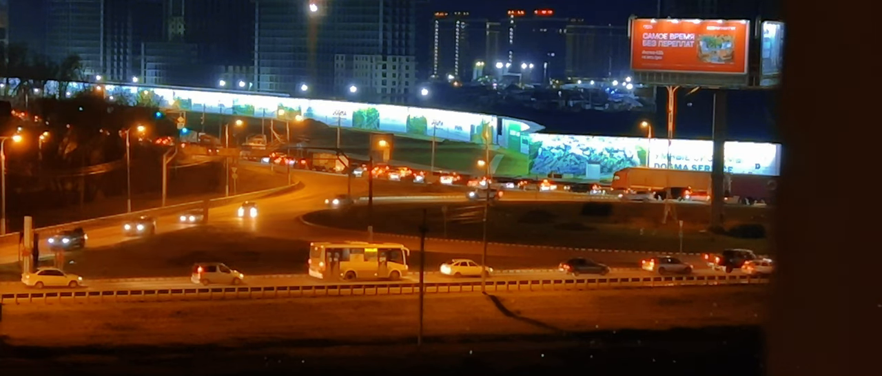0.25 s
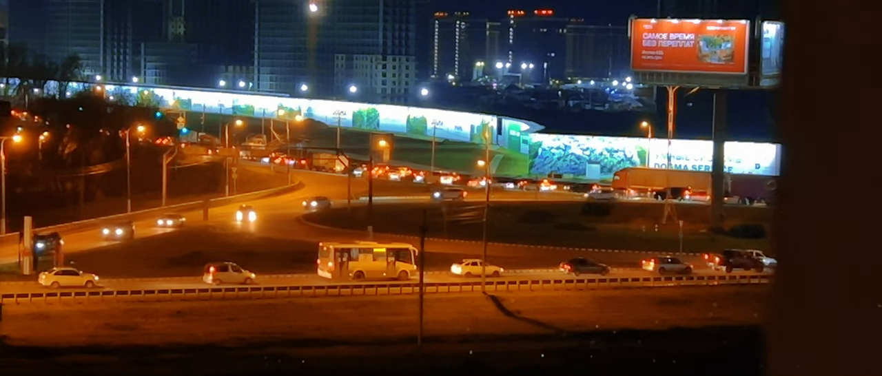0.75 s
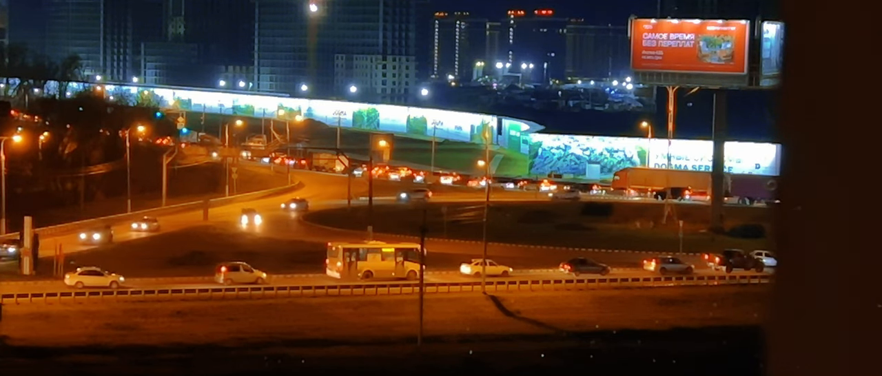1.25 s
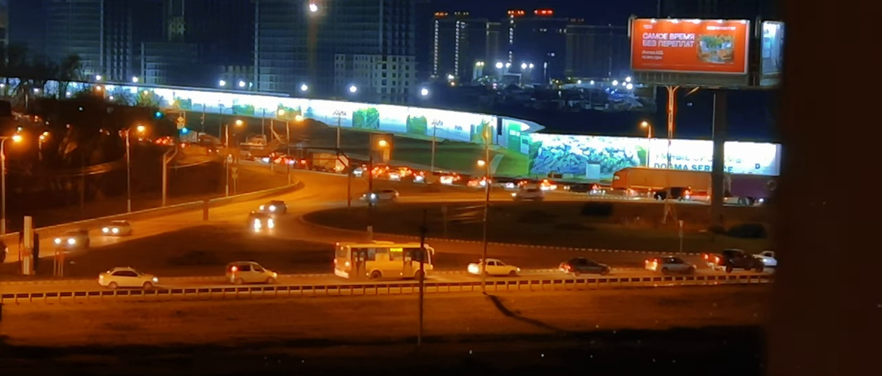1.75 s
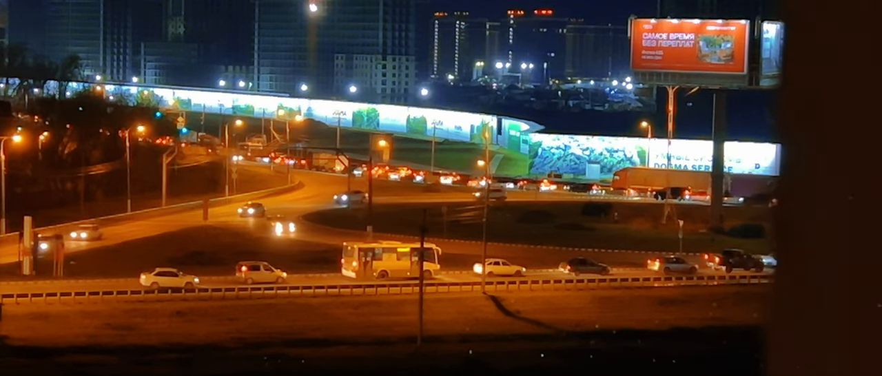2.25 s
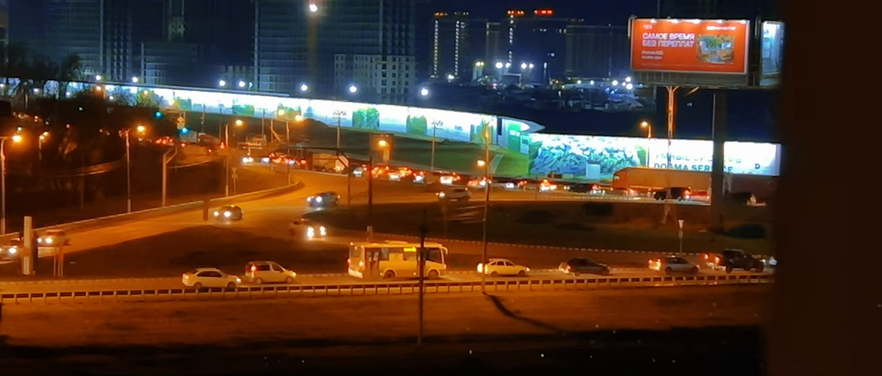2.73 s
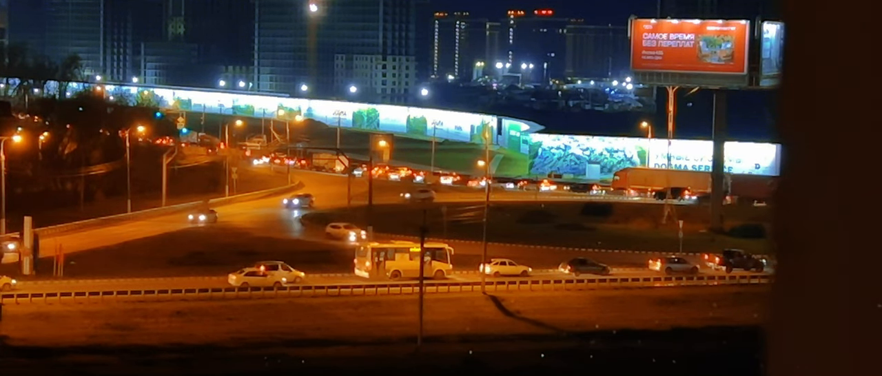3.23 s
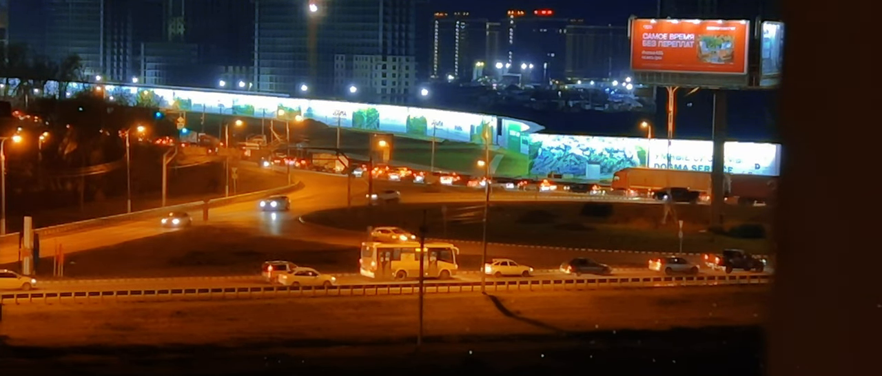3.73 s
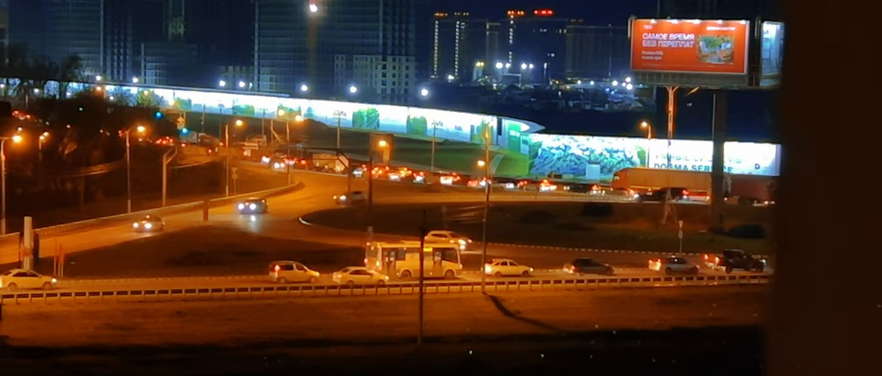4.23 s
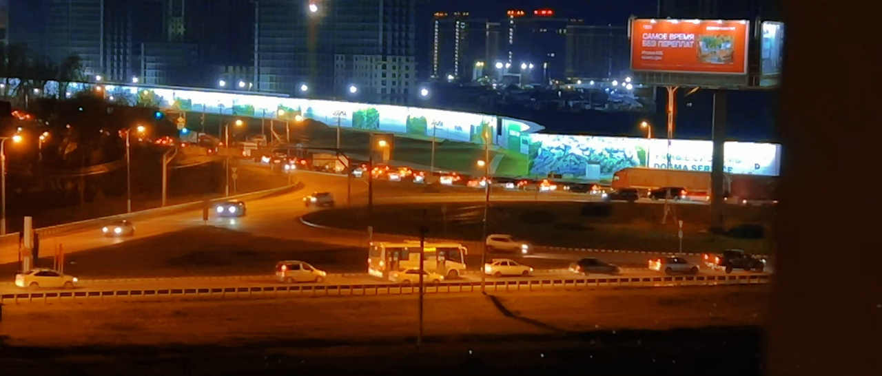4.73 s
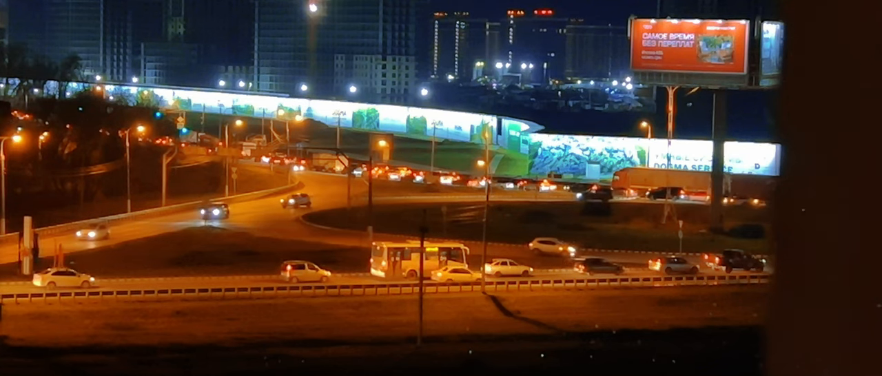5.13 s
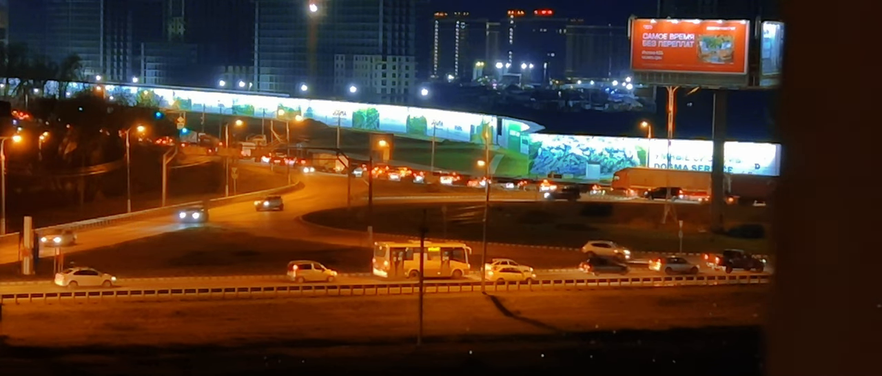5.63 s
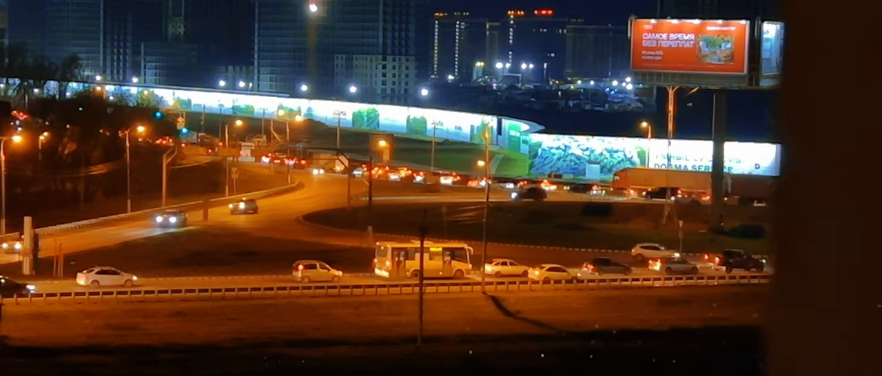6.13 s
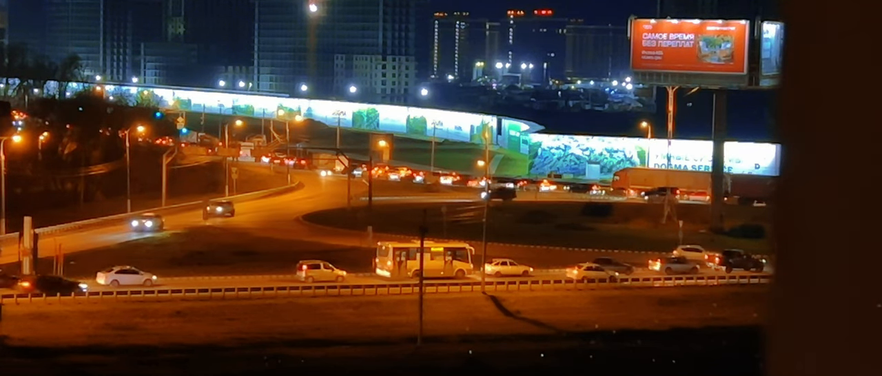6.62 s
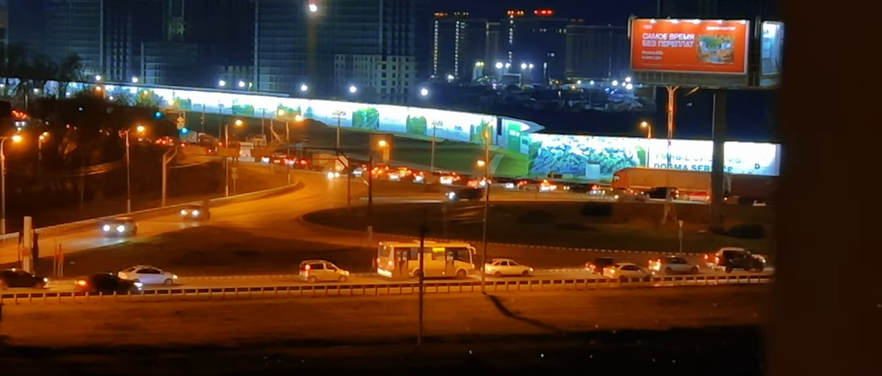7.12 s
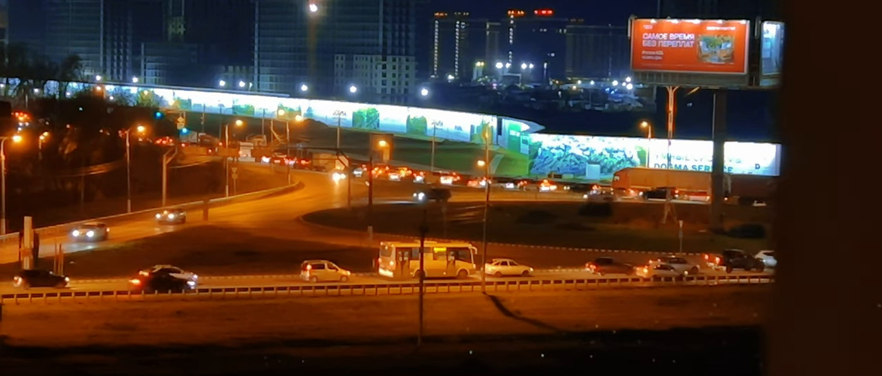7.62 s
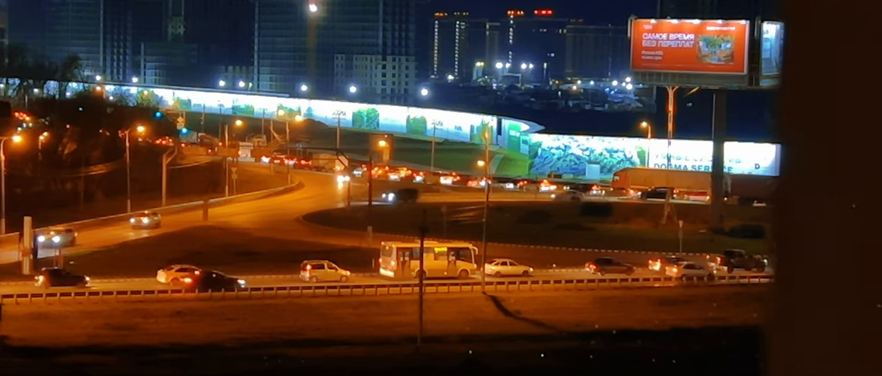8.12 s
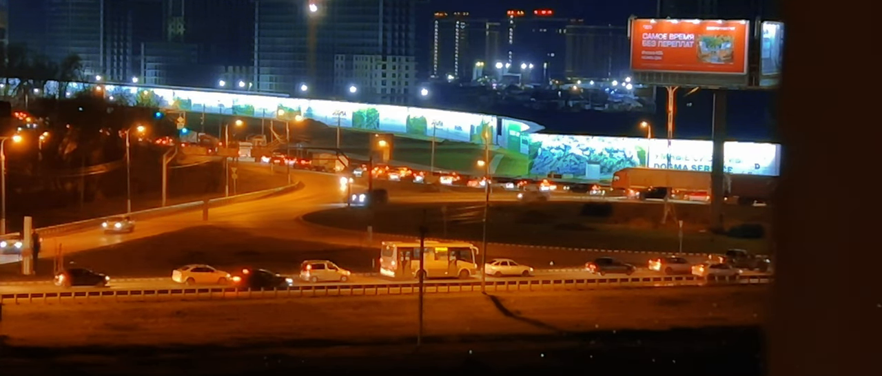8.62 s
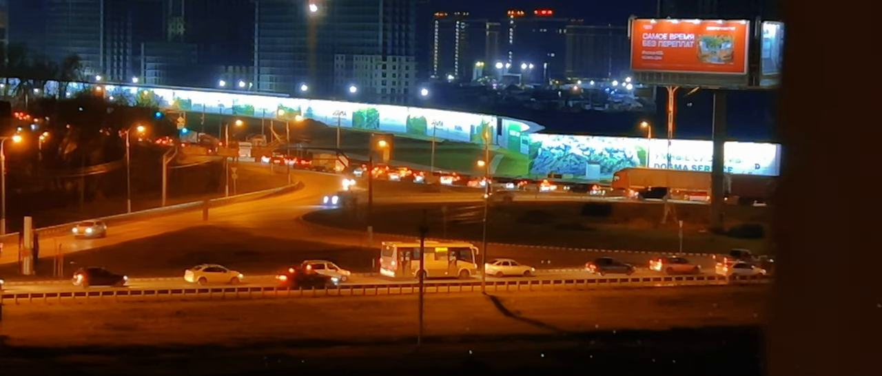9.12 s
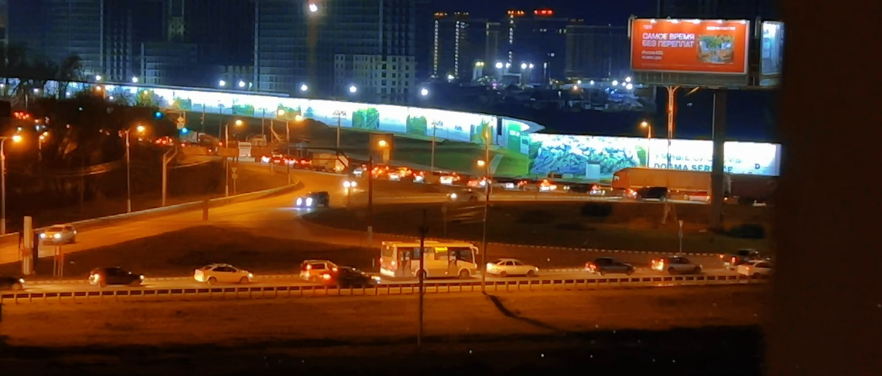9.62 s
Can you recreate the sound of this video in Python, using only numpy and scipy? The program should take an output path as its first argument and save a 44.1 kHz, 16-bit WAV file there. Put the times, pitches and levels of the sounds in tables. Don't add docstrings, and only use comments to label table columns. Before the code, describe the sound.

A deep, continuous rumble of slow city traffic, a revving car near seven seconds, a bus droning by, tiny snaps and faint squeaks.

```python
import sys
import numpy as np
from scipy import signal
from scipy.fft import rfft, irfft, next_fast_len
from scipy.io import wavfile
from scipy.ndimage import uniform_filter1d, map_coordinates

SR = 44100
rng = np.random.default_rng(int(sys.argv[2]) if len(sys.argv) > 2 else 0)


def invert_db(x):
    u = np.asarray(x, float) / 20
    return 10 ** u


def transcribe(signal):
    frames = np.atleast_2d(signal).T
    limited = np.clip(frames, -1, 1)
    pcm = np.round(limited * 32767).astype(np.int16)
    wavfile.write(sys.argv[1], SR, pcm)


N = 434812


def unit(x):
    return x / np.sqrt(np.mean(x ** 2) + 1e-20)


def along(points, hz):
    f, *cols = np.transpose(points)
    return [np.interp(np.log(hz + 1), np.log(f + 1), c) for c in cols]


def curves(rows):
    s, *cols = np.transpose(rows)
    return [np.interp(np.arange(N) / SR, s, c) for c in cols]


def wobble(rate, size=N):
    knots = rng.standard_normal(int(size * rate / SR) + 4)
    return map_coordinates(knots, [np.arange(size) * rate / SR])


def filtered(x, response):
    edge = 4096
    wide = np.pad(x, [(0, 0)] * (np.ndim(x) - 1) + [(edge, edge)], mode="reflect")
    m = next_fast_len(wide.shape[-1])
    spectrum = rfft(wide, m) * response(np.fft.rfftfreq(m, 1 / SR))
    return irfft(spectrum, m)[..., edge:edge + x.shape[-1]]


def resonance(centre_hz, width_hz):
    def response(f):
        damping = 1j * f * width_hz
        return (damping / (centre_hz ** 2 - f * f + damping)) ** 3
    return response


def rush(spectrum, patchy_db):
    z = signal.stft(rng.standard_normal((2, N)), nperseg=512)[2]
    field = uniform_filter1d(rng.standard_normal(z.shape[1:]), size=6, axis=0)
    field = unit(uniform_filter1d(field, size=20, axis=1))
    pair = signal.istft(z * invert_db(patchy_db * field), nperseg=512)[1][:, :N]
    return unit(filtered(pair, lambda hz: invert_db(along(spectrum, hz)[0])))


def notes(rows, orders, fade=0.09, flutter_db=1.0, drift_db=1.5, unsteady=.003):
    hz, level_db = curves(rows)
    t = np.arange(N) / SR
    start, end = rows[0][0], rows[-1][0]
    since_start = t - start + (start == 0)
    until_end = end - t + (end > 9.8)
    heard = np.clip(np.minimum(since_start, until_end) / fade, 0, 1)
    turns = 2 * np.pi * np.cumsum(hz * (1 + unsteady * wobble(6))) / SR
    tone = 0
    for i, (k, db) in enumerate(orders):
        order_db = db + flutter_db * wobble(7) + (i > 0) * drift_db * wobble(2.4)
        tone = tone + invert_db(order_db) * np.sin(k * turns + rng.uniform(0, 2 * np.pi))
    return np.sqrt(2) * heard * invert_db(level_db) * tone


def swell(t, length, db, order=2):
    return invert_db(db - 15.5 * abs(2 * t / length) ** order)


def glides(rows, flutter_db, unsteady, order=2):
    out = np.zeros(N + 4 * SR)
    t = np.arange(-SR, SR) / SR
    for s, length, hz, glide, db in rows:
        rate = (hz + glide * t) * (1 + unsteady * wobble(7.4, size=len(t)))
        turns = 2 * np.pi * np.cumsum(rate) / SR
        level = swell(t, length, db + flutter_db * wobble(7, size=len(t)), order=order)
        out[round(s * SR):][:len(t)] += np.sqrt(2) * level * np.sin(turns)
    return out[SR:SR + N]


def crowd():
    # f/Hz, level/dB per Hz
    idling_bands = [(18, -45), (30, -16), (40, -5.5), (52, 2), (62, 4), (76, 3), (92, -5), (110, -20.5),
                    (140, -44.5), (250, -120)]
    body_bands = [(50, -90.5), (80, -26), (105, -3), (145, -1.5), (190, -9), (240, -5), (300, -9),
                  (400, -12.5), (550, -13.5), (800, -30), (1400, -120)]
    tyre_bands = [(300, -48), (500, -7), (700, -1), (900, 0), (1100, -1.5), (1400, -7), (1650, -9.5),
                  (1850, -11.5), (2000, -16), (2200, -61.5), (2600, -120)]
    hiss_bands = [(1800, -50), (2000, -5), (2170, 0), (2500, -5), (3000, -8), (4000, -17), (5000, -24),
                  (6300, -29.5), (7000, -34), (8000, -41.5), (9000, -45), (11200, -45), (14250, -53),
                  (14600, -85)]
    # t/s, tyre roar/dB, extra brightness/dB
    flow = [(0, -38, 1), (.47, -39, 2), (1.01, -37.5, -0.5), (1.8, -38, 0.5), (2.63, -37, 1.5),
            (3.5, -38.5, 0.5), (4.2, -39, 1), (4.5, -39, 0), (5.25, -38.5, 1), (5.74, -36.5, .5),
            (6.73, -35, 1), (7.22, -35, 0.5), (7.66, -36.5, 1), (8.29, -36.5, -0.5), (9.35, -37, 0),
            (9.6, -35.5, 0.5), (9.86, -36, 1.5)]
    tyre_db, clear_db = curves(flow)
    swing_db = tyre_db - tyre_db.mean()
    idling = invert_db(-31.5 + 0.05 * swing_db) * rush(idling_bands, patchy_db=-0.5)
    body = invert_db(-33 + 0.074 * swing_db) * rush(body_bands, patchy_db=0.2)
    tyres = invert_db(tyre_db + 3.0) * rush(tyre_bands, patchy_db=0.62)
    hiss = invert_db(-49 + 0.49 * swing_db + clear_db) * rush(hiss_bands, patchy_db=0.77)
    return idling + body + tyres + hiss


def whine():
    # f/Hz, level/dB
    lines = [(9528, -98), (9672, -97)]
    return sum(invert_db(db) * unit(filtered(rng.standard_normal(N), resonance(hz, 110))) for hz, db in lines)


def van():
    # t/s, firing f/Hz, level/dB
    path = [
        (0.0, 74.6, -33),
        (0.8, 79.6, -34),
        (1.55, 85.1, -38.5),
        (1.9, 87.2, -51),
    ]
    # multiple of firing rate, level/dB
    van_orders = [(1, 0), (2, -6), (3, -9), (4, -19)]
    return notes(path, van_orders)


def passers():
    surfacing = [(.35, .8, 138.1, 13, -36.5), (.37, .9, 70.3, 1, -36), (.48, 1, 114, 1, -37),
                 (.95, .9, 143.2, 3, -43), (1.1, 0.58, 70, 2, -38.5), (2.6, 1.6, 83.9, 1, -43.5),
                 (2.8, 1.4, 166.4, 0, -46), (3.87, 0.7, 139.3, 12, -38.5), (4.03, 0.77, 78.9, 2, -42),
                 (4.2, 1.0, 125.2, 13, -36), (4.45, .5, 142.5, 0, -40.5), (4.9, .4, 140.9, -6, -36.5),
                 (5.36, .35, 143.7, 0.5, -32), (8.43, 0.37, 65, 1, -22.5), (9.3, 1.6, 132.5, 0.5, -39),
                 (9.6, .45, 62.5, 1.5, -29.5)]
    return glides(surfacing, flutter_db=1.5, unsteady=0.0037)


def queue():
    low_swells = [(0.596, 0.85, 56.5, -36), (1.302, 1.0, 52.26, -33.5), (2.69, 0.48, 53, -38),
                  (3.588, .6, 49.33, -45), (4.257, 0.98, 50.83, -35), (5.31, 2.1, 57.09, -39),
                  (6.306, 0.54, 56.9, -33), (6.925, 1, 54.48, -37), (7.75, 1.5, 55.9, -31.5),
                  (8.799, 0.63, 55.26, -28), (9.541, 0.77, 54.66, -28.5)]
    t = np.arange(N) / SR
    swelling = sum(swell(t - s, length, db) for s, length, hz, db in low_swells)
    pitch = [(0, low_swells[0][2], 0)]
    pitch += [(s, hz, 0) for s, _, hz, _ in low_swells]
    pitch += [(N / SR, low_swells[-1][2], 0)]
    return swelling * notes(pitch, [(1, 0.68)])


def grains(per_second, spread_db):
    sizes = invert_db(spread_db * (np.clip(rng.standard_normal(N), -2, 2) + wobble(70)))
    return unit((rng.random(N) < per_second / SR) * sizes * rng.standard_normal(N))


def crossings():
    # start t/s, hold/s, rustle level/dB, brighter grains/dB relative
    wheels = [(1.123, 1.2, -67, -17.5), (1.931, 0.055, -66.5, -12), (2.052, 0.38, -70, -18),
              (2.604, 0.12, -67.5, -15), (3.19, 0.13, -63.5, -6.5), (3.306, 0.12, -63, -14),
              (3.554, .3, -72, -11), (4.132, 0.17, -68.5, -8.5), (5.0, 0.31, -70, -9),
              (6.12, 0.052, -65.5, -9), (6.59, 0.18, -70.5, -6.5), (6.856, 0.045, -63, -7),
              (7.15, 0.16, -68.5, -5.5), (7.304, 0.081, -66, -10), (7.43, .08, -72, -12.5),
              (7.95, 0.029, -73, -10), (8.3, 0.14, -71.5, -9.5), (8.55, 0.29, -70, -14)]
    rise_db_per_s, fall_db_per_s, floor_db = 202.5, 76.5, -91.5
    t = np.arange(N) / SR
    dull, bright = invert_db(floor_db), invert_db(floor_db - 16)
    for s, hold, db, bright_db in wheels:
        rise_db = rise_db_per_s * np.clip(s - t, 0, 1)
        fall_db = fall_db_per_s * np.clip(t - s - hold, 0, 1)
        shape = invert_db(db - rise_db - fall_db)
        dull, bright = dull + shape, bright + invert_db(bright_db) * shape
    return dull, bright


def grit():
    dull_gain, bright_gain = crossings()
    dull = unit(filtered(grains(3000, spread_db=2.5), resonance(6160, 1500)))
    bright = unit(filtered(grains(2500, spread_db=5.5), resonance(7800, 1100)))
    return invert_db(-3) * (dull_gain * dull + invert_db(-4) * bright_gain * bright)


def snaps():
    # t/s, peak level/dB, f/Hz
    single_snaps = [(1.7714, -46, 6800), (1.9475, -45, 6440), (1.9854, -44, 6210), (2.1206, -54, 6200),
                    (2.7147, -51, 5900), (6.1739, -39, 5570), (6.8758, -55, 6470), (7.3427, -52, 6860),
                    (7.3594, -46, 6240), (7.4764, -59, 6320), (8.3988, -50, 6090), (8.7685, -51, 6050),
                    (1.957, -52, 6860), (3.7419, -56, 7760), (6.145, -47, 6960), (6.7974, -57, 8102),
            (7.205, -46, 6920), (7.3083, -58, 6960), (8.297, -53, 6850)]
    out = np.zeros(N + SR)
    t = np.arange(SR // 20) / SR
    for s, db, hz in single_snaps:
        blow = rng.standard_normal(len(t)) * (1 - np.exp(-t / .0015)) * invert_db(-60 * t / 0.042)
        snap = filtered(np.pad(blow, 5000), resonance(hz, 1500))[5000:]
        out[round(s * SR):][:len(snap)] += invert_db(db - 4.5) * snap / abs(snap).max()
    return out[:N]


def bus():
    # t/s, cycle rate f/Hz, firing note level/dB
    path = [(1.9, 23.3, -55), (2.35, 23.96, -42.5), (2.74, 24.18, -38.5), (3.58, 25.45, -43.5),
            (3.99, 26.1, -41), (4.8, 26.98, -46.5), (5.25, 26.62, -37), (6.1, 25.67, -33.5),
            (6.93, 25.01, -41), (7.35, 24.84, -44), (7.77, 24.46, -31), (9.02, 23.11, -27.5),
            (9.44, 22.48, -34.5), (9.86, 21.8, -34.5)]
    # multiple of cycle rate, pulling level/dB, coasting level/dB
    rasp_orders = [(4, -42.5, -56), (5, -43, -40.5), (7, -49.5, -48), (8, -55.5, -49.5), (9, -44.5, -55)]
    lifts_s, eases_s = 3.8, 1.1
    coasting = np.clip((np.arange(N) / SR - lifts_s) / eases_s, 0, 1)
    firing_db = curves(path)[1]
    rasp = []
    for k, pull_db, coast_db in rasp_orders:
        rasp.append((k, pull_db + (coast_db - pull_db) * coasting - firing_db))
    return notes(path, [(3, 1.0)] + rasp, fade=.3, drift_db=2.5)


def scuffs():
    scrapes = [
        (4.13, .11, 3100, 1100, -50),
        (4.16, .06, 5400, 1100, -62),
        (4.33, .25, 380, 300, -38),
        (6.62, .16, 5100, 1300, -63),
        (5.22, .06, 4700, 600, -66),
        (6.62, .08, 7500, 900, -72),
    ]
    out = np.zeros(N + SR)
    for s, length, hz, width_hz, db in scrapes:
        size = round(length * SR)
        rub = filtered(rng.standard_normal(SR // 4), resonance(hz, width_hz))
        out[round(s * SR):][:size] += invert_db(db) * unit(rub)[:size] * np.hanning(size)
    return out[:N]


def brakes():
    squeaks = [
        (4.33, .19, 5627, -60, -66),
        (8.86, .11, 6570, 1500, -70),
        (6.7, .16, 3320, 0, -62),
        (4.2, .05, 3300, 0, -61),
    ]
    return glides(squeaks, flutter_db=1.5, unsteady=.002, order=4)


def truck():
    # t/s, firing f/Hz, level/dB
    path = [
        (5.7, 73.7, -57),
        (6.0, 73.1, -48),
        (7.2, 73.9, -37),
        (7.5, 75.2, -52.5),
    ]
    # multiple of firing rate, level/dB
    truck_orders = [(2, 0.5), (3, -5), (5, -11.5)]
    return notes(path, truck_orders)


def revving_car():
    # t/s, firing f/Hz, level/dB
    path = [
        (6.1, 64.4, -39),
        (6.45, 62.63, -38),
        (6.92, 72.07, -24.5),
        (7.2, 77.4, -30.5),
        (7.75, 85.9, -43),
        (8.02, 84.4, -37),
        (8.3, 81, -35),
    ]
    # multiple of firing rate, level/dB
    car_orders = [(1, 1.5), (4, -24.5)]
    return notes(path, car_orders)


def ticks():
    # t/s, peak level/dB
    crackles = [
        (7.58, -57.5),
        (8.743, -69),
    ]
    blows, t = np.zeros(N), np.arange(SR // 50) / SR
    for s, db in crackles:
        decay = invert_db(db + 12 - 60 * t / .012)
        blows[round(s * SR):][:len(t)] = decay * rng.standard_normal(len(t))
    return filtered(blows, resonance(12500, 6000))


def ports(pair):
    # f/Hz, likeness 0-1, left leads/rad, left over right/dB
    port_field = [(50, .992, -.1, 0), (150, .985, -.16, -.7), (250, .985, -.2, -1.3), (330, .92, -.4, -2),
                  (420, .65, -.35, -2.5), (550, .4, .3, 0), (750, .5, 1.7, .5), (1000, .2, 2.2, 3),
                  (1200, .4, 0, 4), (1450, .85, -.25, 2), (1900, .99, -.08, .3), (2080, 1, 0, 0),
                  (2520, 1, 0, 0), (2900, .97, .45, 0), (4200, .94, .4, 0), (4800, .99, .15, 0),
                  (6250, .97, .15, 0), (6350, 1, 0, 0), (7500, 1, 0, 0), (7700, .9, -.5, 0),
                  (9000, .85, -1.9, 0), (10450, .99, -3.14, 0), (11300, .9, -4.5, 0), (12350, .85, -5.6, 0),
                  (12450, 1, -6.283, 0)]

    def response(hz):
        alike, lead, balance_db = along(port_field, hz)
        alike = np.clip(alike, 0, 1)
        left = invert_db(balance_db / 2)
        lag = invert_db(-balance_db / 2) * np.exp(-1j * lead)
        return np.array([[left, 0 * hz], [alike * lag, np.sqrt(1 - alike ** 2) * lag]])
    return filtered(pair, response).sum(axis=1)


def scene():
    exhausts = van() + passers() + queue() + bus() + truck() + revving_car()
    single = exhausts + grit() + snaps() + scuffs() + brakes() + ticks()
    return ports(crowd() + single * [[1], [0]])


def roll_off(x):
    return signal.sosfilt(signal.butter(12, 15130, fs=SR, output="sos"), x)


def record(dry):
    from_start = np.arange(N)
    soft_ends = np.clip(np.minimum(from_start, from_start[::-1]) / (.004 * SR), 0, 1)
    return roll_off((dry + whine()) * np.sin(np.pi / 2 * soft_ends) ** 2)


dry = scene()
out = record(dry)
transcribe(out)
```